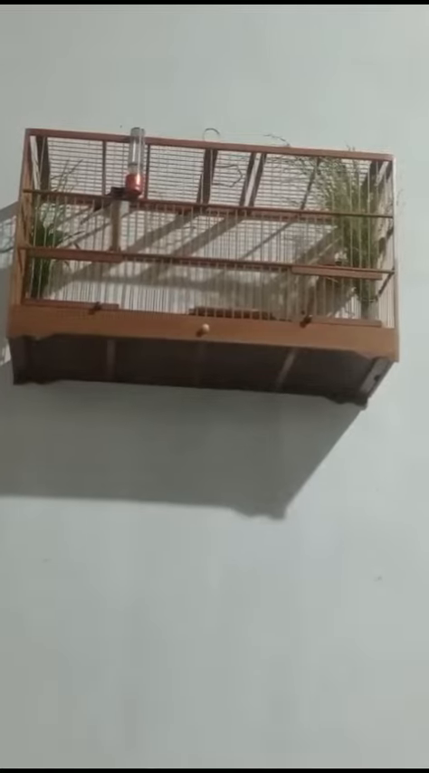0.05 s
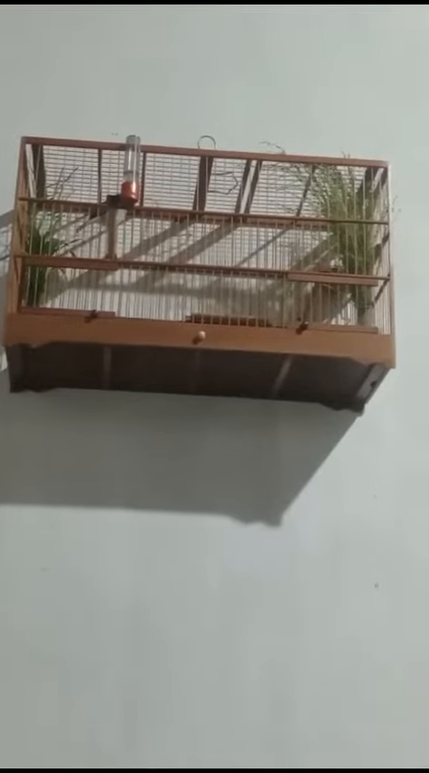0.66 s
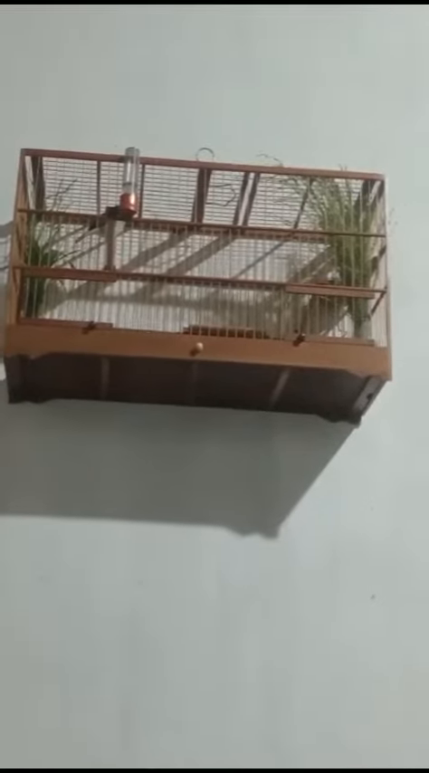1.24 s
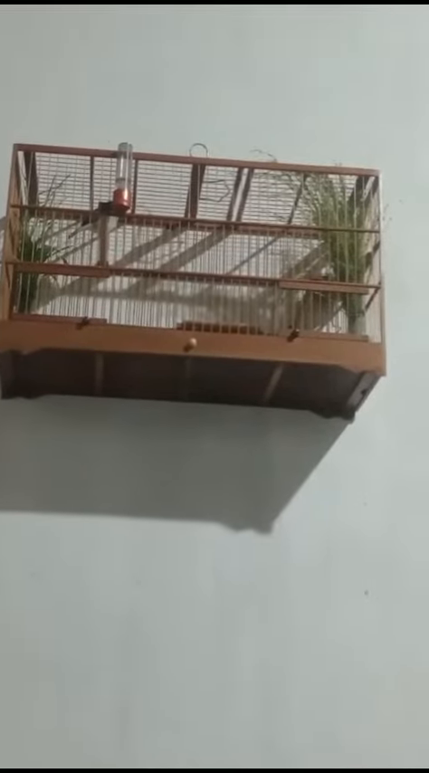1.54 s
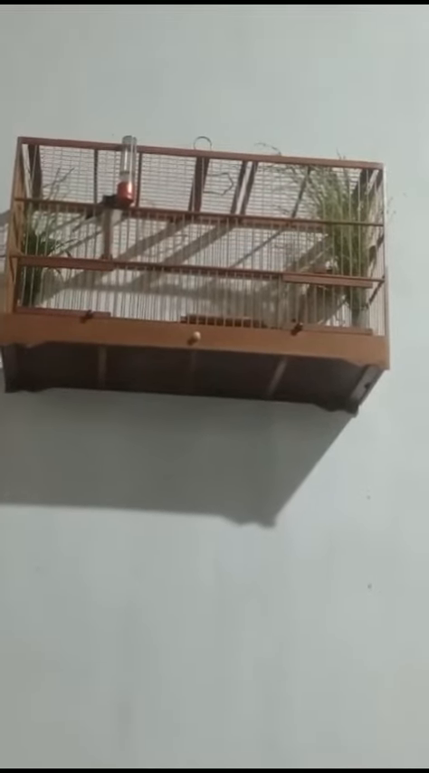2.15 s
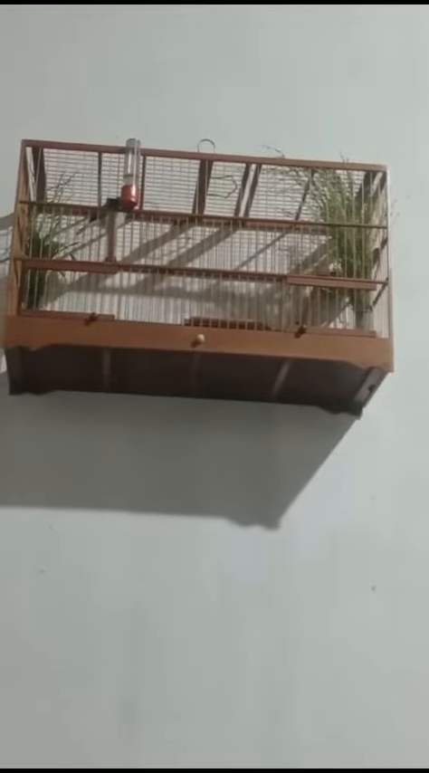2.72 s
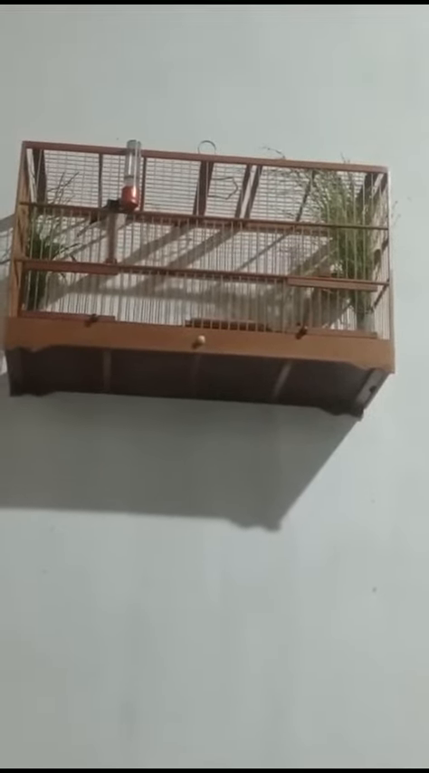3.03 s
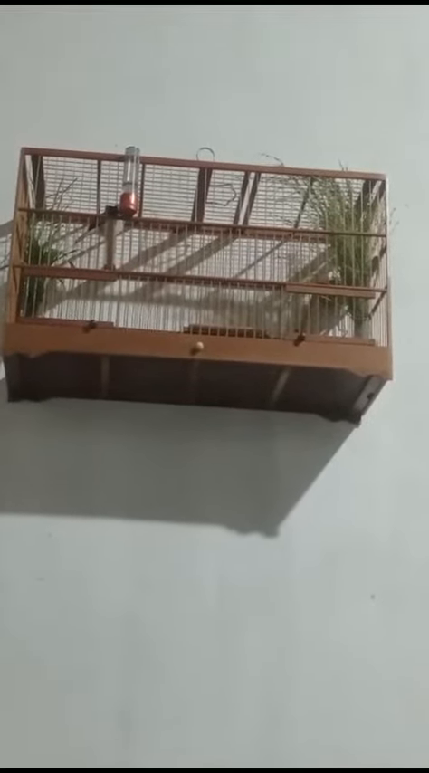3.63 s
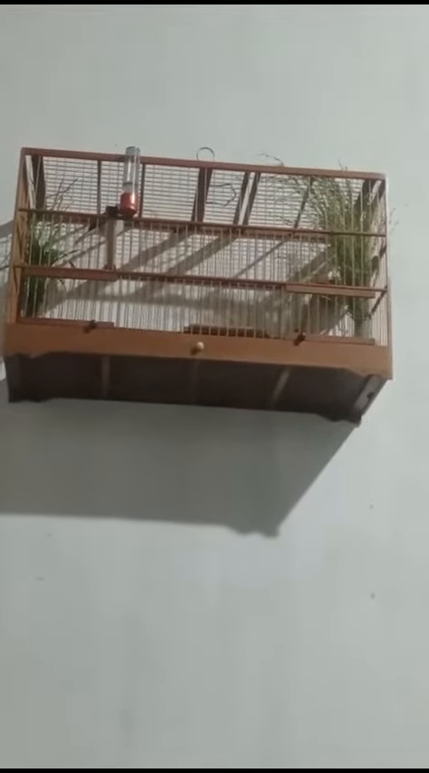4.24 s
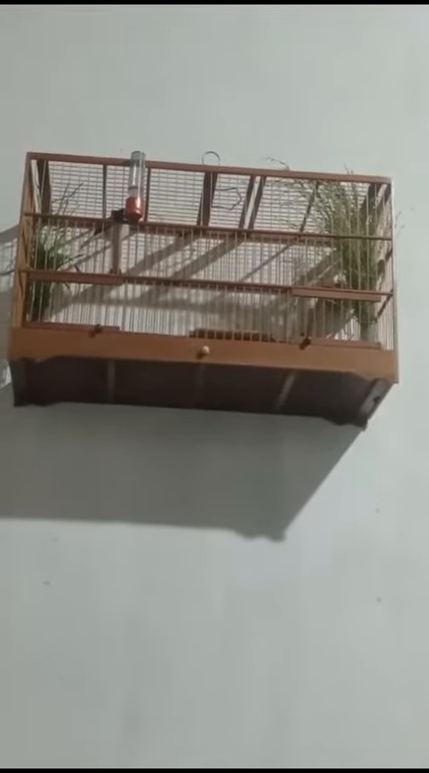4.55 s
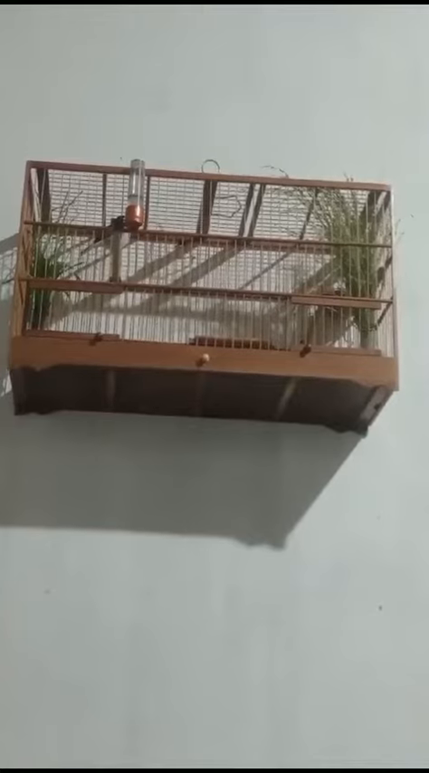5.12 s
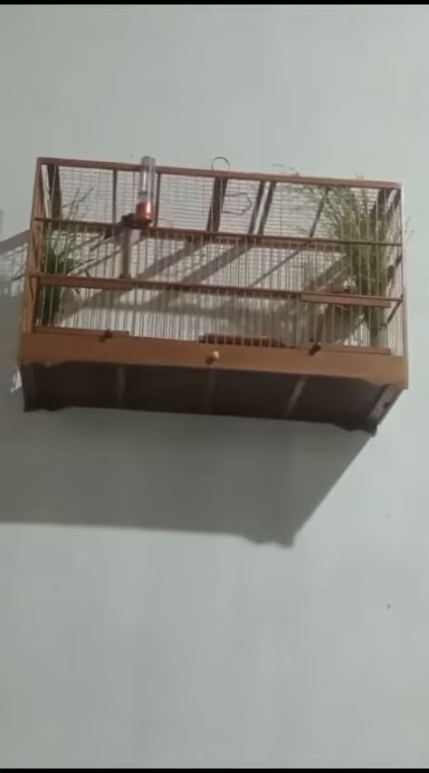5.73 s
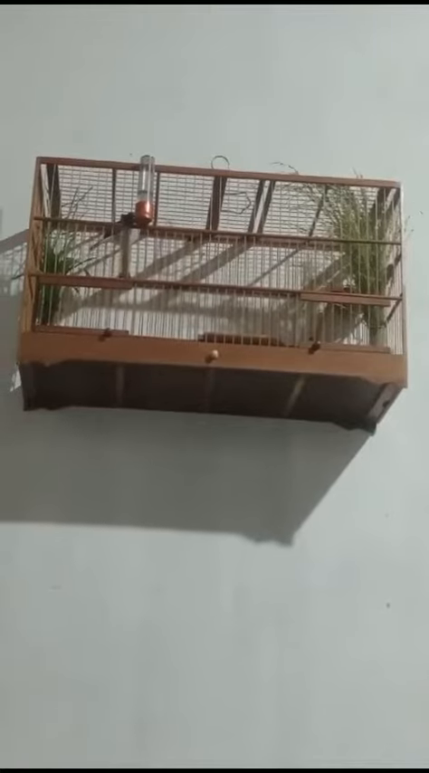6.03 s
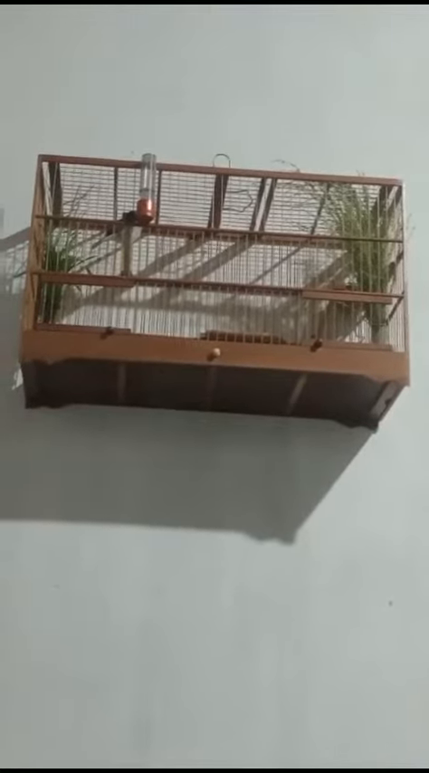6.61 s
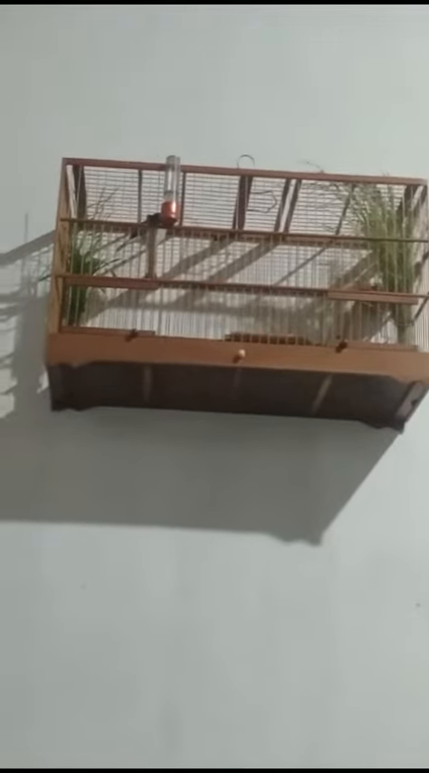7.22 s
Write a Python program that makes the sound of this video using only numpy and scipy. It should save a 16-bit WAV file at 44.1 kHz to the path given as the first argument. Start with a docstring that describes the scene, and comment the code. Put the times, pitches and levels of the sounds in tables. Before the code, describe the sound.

Two raspy, rising calls from a caged songbird ring in a bare room. A lull follows, holding only quiet room noise, a faint high tone, a barely audible distant drone and a small knock on the microphone. The bird then sings a louder phrase of upward whistles and quick downward slurs, trailing into a soft trill. Another small knock comes just before a final sharp, high, two-voiced falling call.

```python
"""Caged songbird in a bare room

From a wooden cage on the wall come two harsh rising calls, a phrase of slurred whistles, a soft low
trill and one high, two-voiced falling call. The whistles are gliding, nearly pure tones with a little
air; the harsh calls rasp as the bird's membranes slap shut unevenly. The room echoes it all. Behind
are a faint steady high tone, a far-off drone, quiet room noise and a few small knocks and scuffs."""
import sys
import numpy as np
from scipy import signal
from scipy.fft import rfft, irfft, next_fast_len
from scipy.io import wavfile
from scipy.ndimage import uniform_filter1d

SR = 44100
rng = np.random.default_rng(int(sys.argv[2]) if len(sys.argv) > 2 else 0)


def dump_mix(stems):
    """Bounce the given channels to the path in sys.argv[1] as a 16-bit WAV at rate SR."""
    frames = np.atleast_2d(stems).T  # one column per channel
    limited = np.clip(frames, -1, 1)  # hard clip at full scale
    pcm = np.round(limited * 32767).astype(np.int16)
    wavfile.write(sys.argv[1], SR, pcm)


N = 320607
TIME = np.arange(N) / SR
PROGRESS = np.linspace(0, 1, 120)  # control points from the start of a note to its end
TOP_HZ = 15750


def undb(db):
    """Decibels to gain."""
    return 10 ** (np.asarray(db) / 20)


def unit(x):
    """Scale to rms 1."""
    return x / np.sqrt(np.mean(x ** 2))


def on_log(hz, points):
    """Read (frequency, value) points on a log-frequency axis."""
    f, value = np.transpose(points)
    return np.interp(np.log(np.maximum(hz, 1)), np.log(f), value)


def shaped(x, gain):
    """Filter by a gain that is a function of frequency."""
    size = next_fast_len(len(x))
    hz = np.arange(size // 2 + 1) * SR / size
    return irfft(rfft(x, size) * gain(hz), size)[:len(x)]


def coloured(x, eq):
    """Apply an EQ curve, then scale to rms 1."""
    return unit(shaped(x, lambda f: undb(on_log(f, eq))))


def waver(size, rate_hz):
    """Smooth random modulation with a spread of 1, rolled off above the rate."""
    return unit(shaped(rng.standard_normal(size + SR), lambda f: 1 / (1 + (f / rate_hz) ** 4)))[:size]


def add(track, start, sound):
    """Mix a sound into the track at a time in seconds."""
    i = max(int(start * SR), 0)
    track[i:i + len(sound)] += sound[:N - i]


def edges(t, attack_s, release_s):
    """Fade depth: 0 while a note holds, growing to 1 at its start and its end."""
    return 1 - np.clip(np.minimum(t / attack_s, (t[-1] - t) / release_s), 0, 1)


def gesture(points):
    """Turn (time, controls...) breakpoints into smooth automation curves and a soft gate."""
    times, *columns = np.transpose(points)
    t = np.arange(times[0], max(times[-1], times[0] + .01), 1 / SR)
    curves = [uniform_filter1d(np.interp(t, times, column), size=300) for column in columns]
    gate = np.clip(np.minimum(t - t[0], t[-1] - t) / .004, 0, 1)
    return *curves, gate


def trembling_phase(hz, jitter, rate_hz):
    """Oscillator phase along a pitch curve that shakes at random by the share `jitter`."""
    return 2 * np.pi * np.cumsum(hz * (1 + jitter * waver(len(hz), rate_hz))) / SR


# Partials of a nearly pure whistle: (harmonic number, level [dB])
WHISTLE_PARTIALS = [(1, -1), (2, -31.5), (3, -35), (4, -47)]


def gliding_tone(points, jitter, jitter_hz, bright_db=0, partials=WHISTLE_PARTIALS):
    """A trembling tone that follows (time, pitch, level) points; bright_db lifts its overtones."""
    hz, db, gate = gesture(points)
    phase = trembling_phase(hz, jitter, jitter_hz)
    tone = sum(undb(partial_db + bright_db * (k > 1)) * np.sin(k * phase) * (k * hz < SR / 2)
               for k, partial_db in partials)
    return np.sqrt(2) * tone * undb(db) * gate


# EQ of the room noise: (frequency [Hz], gain [dB])
ROOM_TONE_EQ = [(15, -45), (25, -14.5), (91, 2.5), (260, -1.5), (297, -3.5), (421, -5), (567, -6),
                (895, -10), (1410, -9.5), (3930, -14.5), (4750, -8), (5280, -12), (5730, -9.5),
                (6380, -16.5), (15500, -18.5)]


def room_tone(level_db=-66, drift_db=-0.26):
    """A quiet bed of noise whose level barely drifts."""
    return undb(level_db + drift_db * waver(N, 1.8)) * coloured(rng.standard_normal(N), ROOM_TONE_EQ)


# Bands of the high tone: (centre [Hz], width [Hz], level [dB])
HIGH_TONE_BANDS = [(4865, 240, -75.5), (5650, 340, -75)]


def high_tone():
    """Two narrow bands of hiss, heard as a faint steady tone."""
    out = np.zeros(N)
    for hz, width, db in HIGH_TONE_BANDS:
        band = shaped(rng.standard_normal(N), lambda f: 1 / (1 + ((f - hz) / width) ** 2) ** 2)
        out += undb(db) * unit(band)
    return out


# Timbre of the drone: (harmonic number, level [dB])
DRONE_PARTIALS = [(1, 0.5), (2, -7), (3, -10), (4, -14), (5, -10.5)]
# Its notes: (time [s], length [s], start pitch [Hz], end pitch [Hz], level [dB])
DRONE_NOTES = [(0.901, 0.235, 234.6, 262.3, -73.5), (1.12, 1.26, 281.2, 275.8, -73),
               (2.829, .5, 297, 314, -75.5)]


def far_drone(fade_db=7, fade_s=0.074):
    """Held far-off tones that drift in pitch and waver in level."""
    out = np.zeros(N)
    for start, length, from_hz, to_hz, db in DRONE_NOTES:
        t = PROGRESS * length
        hz = from_hz + (to_hz - from_hz) * PROGRESS
        level = db - fade_db * edges(t, fade_s, fade_s)
        points = list(zip(start + t, hz, level))
        tone = gliding_tone(points, jitter=0.013, jitter_hz=24.8, partials=DRONE_PARTIALS)
        add(out, start, tone * undb(2.6 * waver(len(tone), rate_hz=11)))
    return out


# Dull bumps on the phone: (time [s], push level [dB], contact time [s], tick level [dB])
BUMPS = [(2.591, -40, 0.001, -54), (2.61, -46.5, 0.0014, -42), (6.7822, -31, 0.0011, -38)]


def knocks():
    """Each bump is one short soft push, with a tiny tick as it makes contact."""
    push, touch = np.zeros((2, N))
    for at, push_db, contact, tick_db in BUMPS:
        push += undb(push_db) * np.exp(-(np.pi * (TIME - at) / contact) ** 2)
        touch += undb(tick_db) * np.exp(-(np.pi * (TIME - at + contact / 2) / contact) ** 2)
    thud = signal.sosfilt(signal.butter(2, 160, "high", fs=SR, output="sos"), push)
    tick = shaped(touch * rng.standard_normal(N), lambda f: 1 / np.hypot(1, f / 2500))
    return thud + tick


# Light scuffs in the cage: (time [s], level [dB], half-width [s])
CAGE_SCUFFS = [(0.81, -66, 0.063), (2.603, -64, 0.0068), (3.3, -74, 0.016), (6.459, -57.5, 0.009)]
# Their EQ: (frequency [Hz], gain [dB])
SCUFF_EQ = [(100, -13), (300, 5), (1200, -1), (4000, -2), (9000, -10.5), (15000, -10)]


def scuffs():
    """Soft brushing: brief bell-shaped swells of noise."""
    swell = sum(undb(db) * np.exp(-((TIME - at) / width) ** 2) for at, db, width in CAGE_SCUFFS)
    return swell * coloured(rng.standard_normal(N), SCUFF_EQ)


# Reverb decay of the bare room: (frequency [Hz], time to fall 60 dB [s])
REVERB_DECAY = [(500, 0.98), (3000, 0.41), (5000, 0.51), (8000, 0.41), (15000, 0.37)]
# Early reflections off the wall and the cage: (delay [s], gain [dB])
REFLECTIONS = [(.0013, -27.5), (.0043, -18.5)]
# How loud the direct sound is over time: (time [s], gain [dB])
DIRECT_LEVEL = [(0, 1.5), (.45, 2.5), (.6, -10), (3.7, 5), (4.1, 2.5), (4.45, -1.5), (5.05, 1), (5.5, -3.5),
                (7.12, 1.5), (7.18, -10.5)]


def room(x, tail_db=2, predelay_s=0.0015, build_s=0.0035):
    """Direct sound, early reflections, then a dense tail whose treble dies first."""
    t = TIME[:SR]
    noise, tail = rng.standard_normal(SR), np.zeros(SR)
    centres, decays = np.transpose(REVERB_DECAY)
    for weights, t60 in zip(np.eye(len(centres)), decays):
        band = list(zip(centres, weights))  # 1 at this centre, 0 at the others
        tail += shaped(noise, lambda f: on_log(f, band)) * undb(-60 * t / t60)
    tail *= np.clip((t - predelay_s) / build_s, 0, 1)
    response = undb(tail_db) * tail / np.sqrt(np.sum(tail ** 2))
    for delay, db in REFLECTIONS:
        response[int(delay * SR)] += undb(db)
    direct = x * undb(np.interp(TIME, *np.transpose(DIRECT_LEVEL)))
    return direct + signal.fftconvolve(x, response)[:N]


def airy(tone, air_db, spread_hz=2200):
    """Turbulent air flutters the tone and spreads a skirt of hiss around it."""
    flutter = unit(shaped(rng.standard_normal(len(tone)), lambda f: 1 / (1 + (f / spread_hz) ** 2)))
    hiss = shaped(tone * flutter, lambda f: 1 / (1 + (2500 / (f + 1)) ** 4))
    return tone + undb(air_db) * hiss


def trill(start=5.497, period_s=.0948, count=11, top_hz=2850, crest_s=5.76, crest_db=-55.5):
    """Soft, even pips, each arching over and sliding down; the run swells, then fades and sinks."""
    out = np.zeros(N)
    times = start + period_s * np.arange(count)
    sink = .28 * np.exp((times - times[-1]) / 0.1224)  # share of the pitch lost
    levels = crest_db - 21 * (times - crest_s) ** 2
    lead_s, fall_s = 0.015, 0.0303
    for at, hz, db in zip(times, top_hz * (1 - sink), levels):
        points = [(at - lead_s, hz * .95, db + 2),
                  (at, hz, db),
                  (at + fall_s / 3, hz * .85, db - 7),
                  (at + fall_s, hz * .7, db - 7)]
        pip = gliding_tone(points, jitter=0.034, jitter_hz=503)
        add(out, at - lead_s, airy(pip, air_db=-4.5, spread_hz=520))
    return out


def song_note(points, rough, bright_db):
    """One whistle of the phrase; roughness shakes its pitch and adds air."""
    tone = gliding_tone(points, jitter=.07 * rough, jitter_hz=402, bright_db=bright_db)
    return airy(tone, air_db=-21 + 20 * np.log10(max(rough, .01)))


# Upward whistles: (time [s], lead-in [s], length [s], start pitch [Hz], end pitch [Hz],
# steepest after [s], top level [dB], swell [dB], roughness [0-1], overtone gain [dB])
RISING_NOTES = [(3.541, 0.033, .2, 2774, 3280, .06, -33, 18, 0.08, -10),
                (3.915, 0.053, 0.17, 2840, 3524, .078, -22.5, 16, 0.13, -7),
                (4.224, .034, .11, 2740, 3820, .052, -24, 9.5, .3, -5.5)]


def rising_whistles(step_share=.58, step_s=.016, lead_db=-17):
    """A soft lead-in, then an upward slur, part ramp and part quick step, that swells as it climbs."""
    out = np.zeros(N)
    for start, lead_s, length, from_hz, to_hz, steep_s, db, swell_db, rough, bright_db in RISING_NOTES:
        t = PROGRESS * length
        step = (1 + np.tanh((t - steep_s) / step_s)) / 2
        lift = step_share * step + (1 - step_share) * PROGRESS
        hz = from_hz + (to_hz - from_hz) * lift
        level = db - swell_db * (1 - (lift + PROGRESS) / 2)
        points = [(start - lead_s, from_hz * .92, level[0] + lead_db),
                  (start - .008, from_hz * .96, level[0] + lead_db * 0.86),
                  *zip(start + t, hz, level),
                  (start + length + 0.011, to_hz * 1.1, db - 20.5)]  # flicks up on release
        add(out, start - lead_s, song_note(points, rough, bright_db))
    return out


# Slurs, mostly falling: (time [s], length [s], start pitch [Hz], end pitch [Hz], bend [1 is straight,
# more levels off], level [dB], crest [share of the note], roughness [0-1], overtone gain [dB])
SLURRED_NOTES = [(.305, 0.031, 2700, 2800, 1, -52, 0.6, 0.61, -15),
                 (3.525, 0.057, 4360, 4200, 1, -65.5, 0.39, 0.35, -13.5),
                 (4.331, 0.14, 5044, 4181, 1.4, -21, .68, .29, 0),
                 (4.455, 0.033, 2260, 1765, 0.98, -56, 0.45, .95, -15.5),
                 (4.536, 0.036, 5600, 6405, 1.5, -27.5, 0.8, 0.41, 1.5),
                 (4.572, .163, 6133, 4746, 1.05, -24.5, 0.67, 0.26, -1),
                 (4.803, .042, 5640, 6300, 1, -32.5, 0.44, 0.27, -3),
                 (4.84, .14, 7390, 6370, 2.7, -27.5, 0.54, .11, -2),
                 (4.984, 0.12, 4700, 2750, .9, -32, .46, 0.58, -5.5),
                 (5.002, .074, 5098, 4143, 1.4, -31, 0.87, .6, -10),
                 (5.297, 0.071, 6700, 3670, 1.1, -53, 0.44, 0.93, -18)]


def slurred_whistles(arch_db=5, fade_db=17):
    """Each whistle glides to its last pitch under an arch of loudness."""
    out = np.zeros(N)
    for start, length, from_hz, to_hz, bend, db, crest, rough, bright_db in SLURRED_NOTES:
        t = PROGRESS * length
        hz = to_hz + (from_hz - to_hz) * (1 - PROGRESS) ** bend
        arch = db - arch_db * (PROGRESS / crest - 1) ** 2
        level = arch - fade_db * edges(t, attack_s=.014, release_s=0.012)
        add(out, start, song_note(list(zip(start + t, hz, level)), rough, bright_db))
    return out


# The last call, a row for each side of the syrinx: (time [s], length [s], fall time [s],
# fall length [s], top pitch [Hz], end pitch [Hz], level [dB], attack [s])
SYRINX_SIDES = [(7.08, .11, 7.124, 0.057, 8465, 5066, -21, 0.032),
                (7.133, 0.077, 7.142, .046, 8450, 7560, -25.5, 0.01)]


def two_voice_call(db_per_octave=12.5, fade_db=23, square_db=-11, cube_db=-6):
    """Two high falling whistles share one airway and modulate each other into sum and difference tones."""
    first, second = np.zeros((2, N))
    call_start = SYRINX_SIDES[0][0]
    for side, row in zip((first, second), SYRINX_SIDES):
        start, length, fall_at, fall_s, top_hz, end_hz, db, attack_s = row
        t = PROGRESS * length
        fall = (1 - np.cos(np.pi * np.clip((start + t - fall_at) / fall_s, 0, 1))) / 2
        scoop = 1 - .17 * np.exp(-(start + t - call_start) / .004)  # slides up into the opening pitch
        hz = (top_hz + (end_hz - top_hz) * fall) * scoop
        level = db + db_per_octave * np.log2(hz / top_hz)  # weakens as it falls
        level -= fade_db * edges(t, attack_s, release_s=0.013)
        points = list(zip(start + t, hz, level))
        add(side, start, gliding_tone(points, jitter=.006, jitter_hz=400, bright_db=12))
    swing = second / np.abs(second).max()
    joint_swing = swing + first / np.abs(first).max()
    sidebands = first * swing * (undb(square_db) + undb(cube_db) * joint_swing)
    # the small beak radiates the low difference tones poorly
    sidebands = shaped(sidebands, lambda f: 1 / (1 + (2150 / (f + 1)) ** 8))
    return airy(first + second + sidebands, air_db=-30, spread_hz=2100)


# Resonances of the throat and open beak in a harsh call: (frequency [Hz], gain [dB])
THROAT_EQ = [(1200, -31.5), (1750, -22.5), (2400, -7.5), (3000, -10.5), (3600, -9), (4780, 7.5), (5400, 1),
             (6100, -3), (7300, -5.5), (8500, -18.5), (11500, -24.5), (14500, -18), (16000, -21)]


def harsh_voice(points, rasp_db=-1):
    """The membranes slap shut unevenly: rough harmonics and pulsed air noise, shaped by the throat."""
    hz, db, rough, gate = gesture(points)
    phase = trembling_phase(hz, jitter=.075 * rough, rate_hz=600)
    stack = unit(sum(np.cos(k * phase) * (k * hz < TOP_HZ) for k in range(1, 10)))
    rasp = rng.standard_normal(len(hz)) * (1 + np.cos(phase)) * rough * undb(rasp_db)
    return coloured(stack + rasp, THROAT_EQ) * undb(db) * gate


# Rasps within the song: (time [s], length [s], pitch [Hz], level [dB])
SONG_RASPS = [(3.974, 0.024, 2074, -52), (4.338, 0.032, 2985, -41), (7.076, 0.027, 3800, -58)]


def brief_rasps(fade_db=13):
    """Fully rough catches in the voice that fade at once."""
    out = np.zeros(N)
    for start, length, hz, db in SONG_RASPS:
        add(out, start, harsh_voice([(start, hz, db, 1), (start + length, hz, db - fade_db, 1)]))
    return out


# Harsh opening calls: (time [s], clear part [s], break [s], rough part [s], pitch [Hz], level [dB],
# level after the break [dB], roughness of the clear part [0-1])
OPENING_CALLS = [(.01, .074, .036, .092, 1680, -33.5, -37.5, 0.14),
                 (.378, .096, .012, .098, 1690, -31, -37, 0.09)]


def breaking_calls(attack_s=.026, creep=1.075, onset_rough=0.656, broken_rough=0.623):
    """Each starts hoarse, creeps up and clears, then breaks to a higher rasp that sags at the end."""
    out = np.zeros(N)
    for start, clear_s, break_s, rough_s, hz, db, broken_db, clear_rough in OPENING_CALLS:
        crack = start + clear_s
        points = [(start, hz * .97, db - 22, onset_rough),
                  (start + attack_s, hz * 1.015, db - 4.5, onset_rough),
                  (start + 2 * attack_s, hz * creep ** .75, db - 2.25, clear_rough),
                  (crack, hz * creep, db, clear_rough),
                  (crack + break_s, hz * 1.3, broken_db, broken_rough),
                  (crack + rough_s * .7, hz * 1.45, broken_db, broken_rough),
                  (crack + rough_s, hz * 1.33, broken_db - 3.5, broken_rough)]
        add(out, start, harsh_voice(points))
    return out


# How the open beak colours the whistles: (frequency [Hz], gain [dB])
BEAK_EQ = [(3000, -2.5), (6500, -0.5), (8200, -1.5), (9800, 5.5), (11800, 1.5), (13000, 1), (14200, 10),
           (15800, -2)]


def bird():
    """The whole song: whistles filtered by the beak, plus the harsh calls and rasps."""
    whistles = two_voice_call() + rising_whistles() + slurred_whistles() + trill()
    return shaped(whistles, lambda f: undb(on_log(f, BEAK_EQ))) + breaking_calls() + brief_rasps()


def scene():
    """Mono mix: bird and scuffs through the room, with dry knocks and the background bed."""
    cage = room(bird() + scuffs())
    return (cage + knocks() + room_tone() + high_tone() + far_drone())[None]


def record(dry):
    """The phone thins the deep bass and cuts the top."""
    thin = signal.sosfilt(signal.butter(2, 42, "high", fs=SR, output="sos"), dry)
    return signal.sosfilt(signal.ellip(10, .2, 70, TOP_HZ, fs=SR, output="sos"), thin)


dry = scene()
out = record(dry)
dump_mix(out)
```